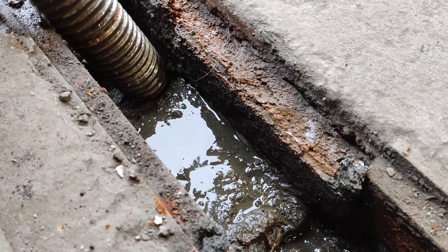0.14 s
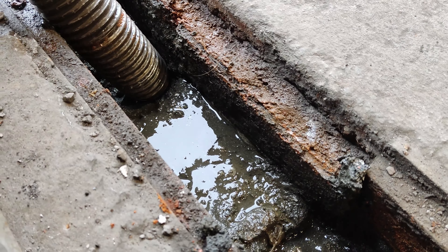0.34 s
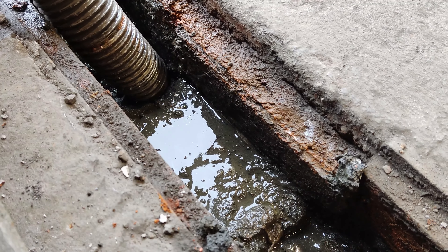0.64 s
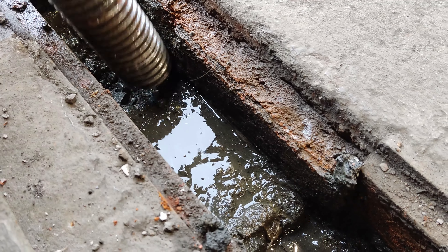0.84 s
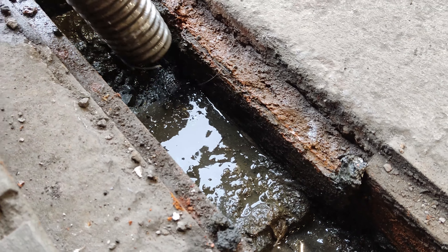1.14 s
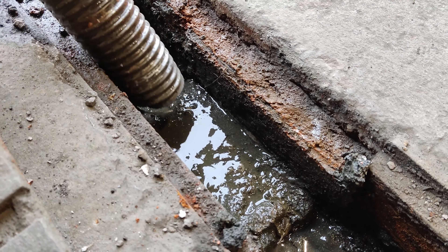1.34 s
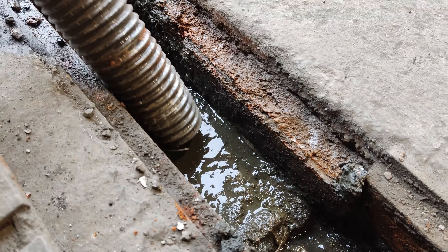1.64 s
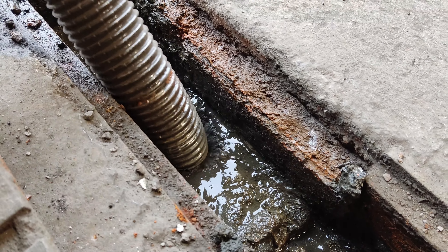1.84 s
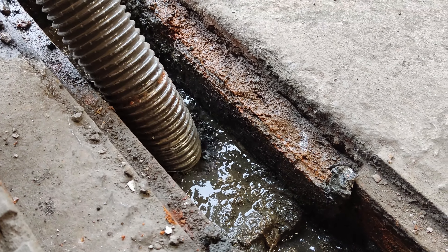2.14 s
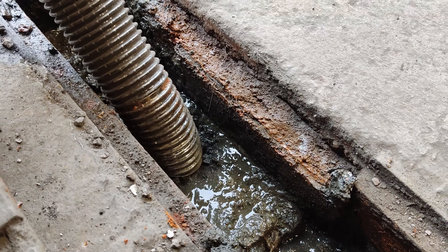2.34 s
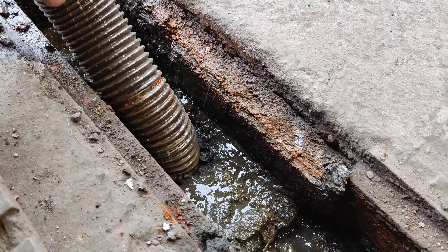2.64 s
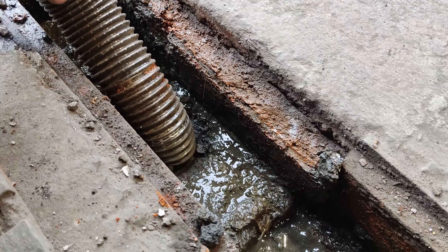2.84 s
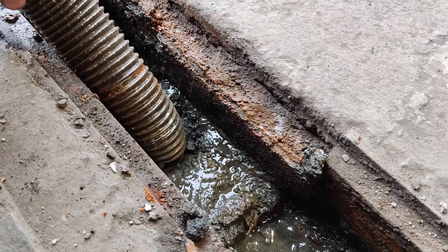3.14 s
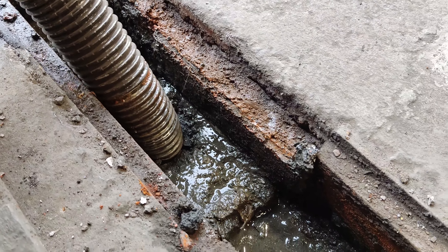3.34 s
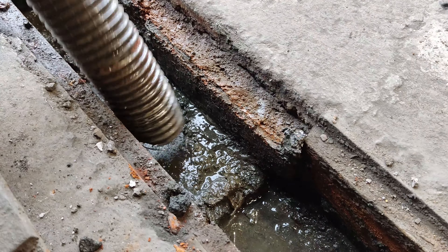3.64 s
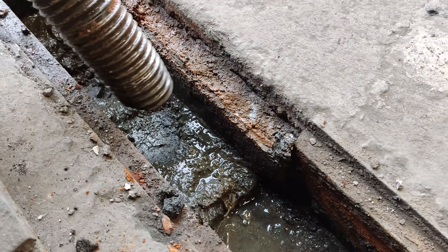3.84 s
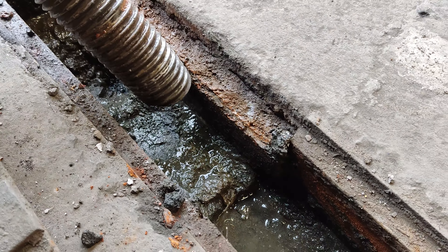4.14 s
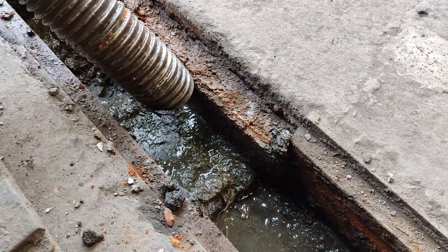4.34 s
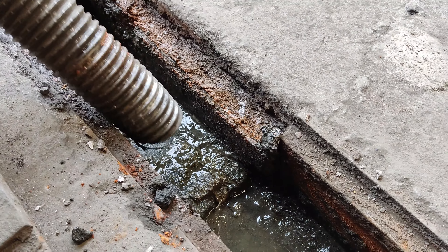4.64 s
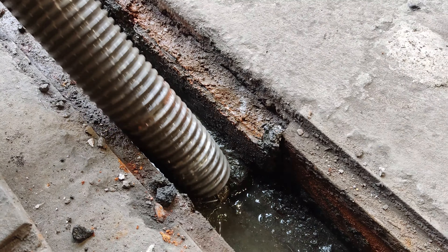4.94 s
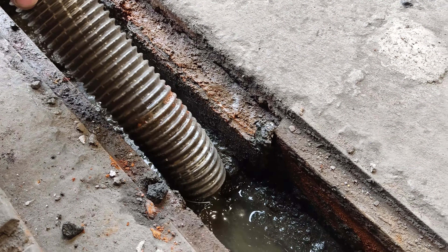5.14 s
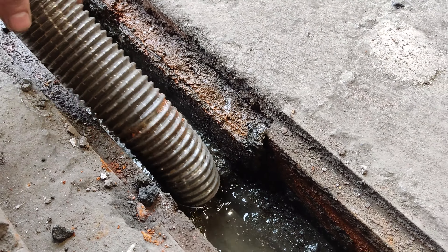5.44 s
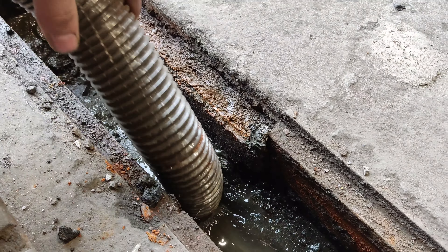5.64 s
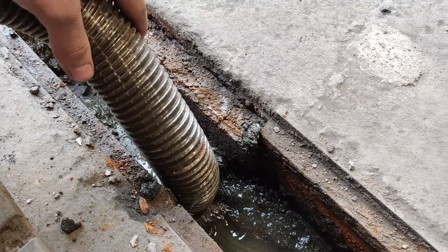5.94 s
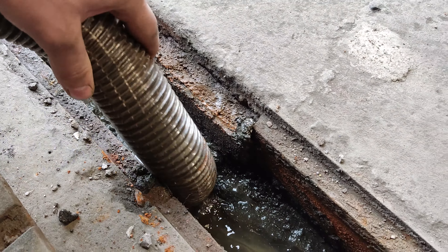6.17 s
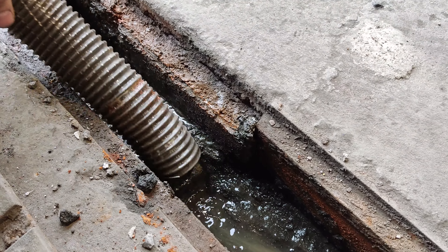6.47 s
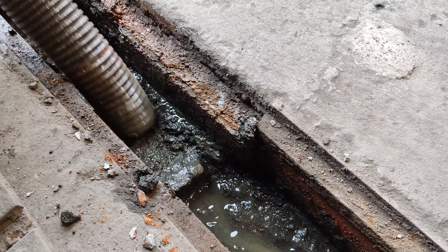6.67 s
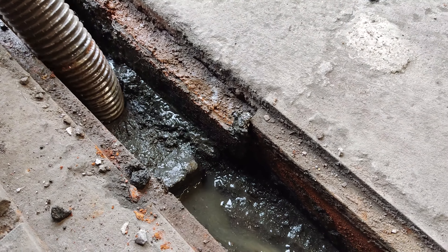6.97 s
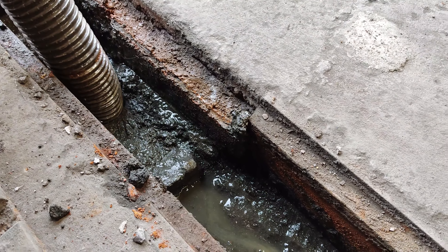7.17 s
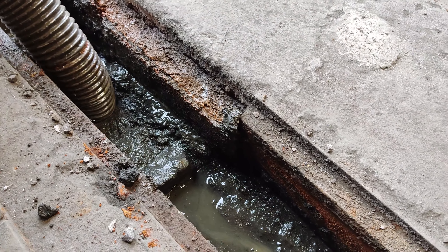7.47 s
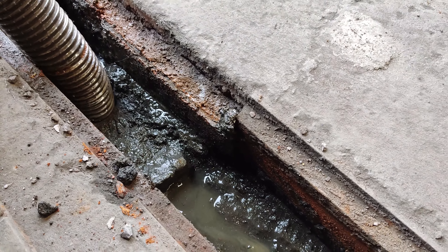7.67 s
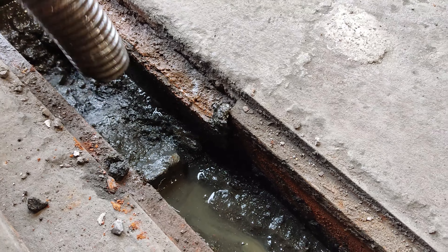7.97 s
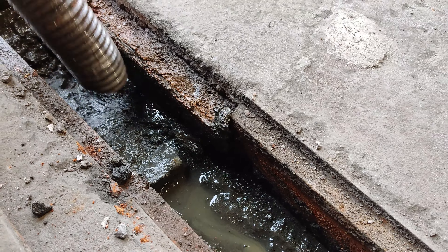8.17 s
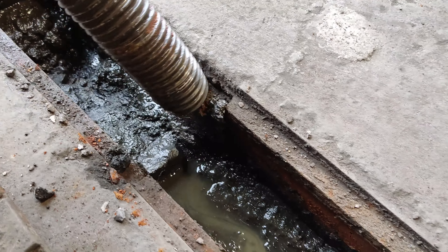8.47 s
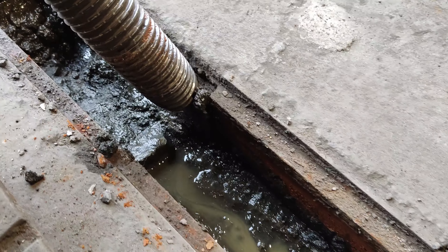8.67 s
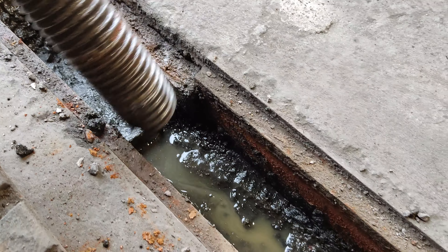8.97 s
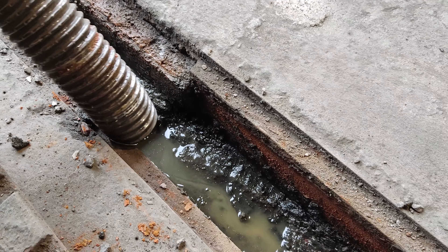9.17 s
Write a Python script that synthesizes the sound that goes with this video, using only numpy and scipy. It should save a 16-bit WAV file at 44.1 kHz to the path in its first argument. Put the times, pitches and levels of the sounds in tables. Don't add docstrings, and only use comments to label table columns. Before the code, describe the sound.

A wet suction hose works along a sludgy drain channel, close to a phone's stereo microphones. Bright, prickly spray hiss runs throughout over rushing air, a low bore roar and gurgling. The mouth chokes, seals and reopens, causing abrupt dips and surges. Grit ticks at the rim, a few slugs slap around four and five and a half seconds, and a thin whistle flashes just after six.

```python
import sys
import numpy as np
from scipy import signal
from scipy.io import wavfile
from scipy.ndimage import map_coordinates

SR = 44100
rng = np.random.default_rng(int(sys.argv[2]) if len(sys.argv) > 2 else 0)


def put_to_file(sound):
    columns = np.atleast_2d(sound).T
    safe = np.clip(columns, -1, 1)
    whole_steps = np.round(safe * 32767)
    wavfile.write(sys.argv[1], SR, whole_steps.astype(np.int16))


def to_linear_factor(level_db):
    exponent = np.asarray(level_db, float) / 20
    return 10 ** exponent


N = 410571


def unit_rms(x):
    return x / np.sqrt(np.mean(x ** 2) + 1e-20)


def in_time(rows):
    s, *columns = np.transpose(rows)
    return [np.interp(np.arange(N) / SR, s, c) for c in columns]


def drift(rate_hz):
    r = np.exp(-80 * np.pi * rate_hz / SR)
    noise = rng.standard_normal(N // 40 + 2002)
    slow = signal.lfilter([1], [1, -2 * r, r * r], noise)[2000:]
    return np.interp(np.arange(N) / 40, np.arange(len(slow)), unit_rms(slow))


def resonance(x, hz, width_hz):
    r = np.exp(-np.pi * width_hz / SR)
    top = np.array([1, 0, -1]) * (1 - r * r) / 2
    return signal.lfilter(top, [1, -2 * r * np.cos(2 * np.pi * hz / SR), r * r], x)


def tents(s, before, after, *columns):
    t = np.arange(0, N + 64, 64)[:, None] / SR - s
    shape = np.clip(1 - np.where(t < 0, -t / before, t / after), 0, 1)
    return np.array([np.interp(np.arange(N) / 64, np.arange(len(t)), shape @ c) for c in columns])


# (time [s], left port later by [ms], how well seated [0-1])
SEATING = [(0, 0.13, 0.87), (.46, 0.18, 0.82), (1.05, 0.087, 0.73), (1.15, 0.11, 0.3), (1.63, 0.21, 0.02),
           (1.86, 0.09, 0.77), (3.76, 0.11, 0.84), (3.82, 0.15, 0.33), (4.3, 0.14, 0.3), (4.7, 0.14, 0.54),
           (5.8, 0.071, 0.93), (6.5, 0.09, 0.8), (7.15, 0.19, 0.89), (7.98, 0.18, 0.75), (8.0, 0.14, 0.74),
           (8.6, 0.3, 0.6), (9.0, 0.12, 0.44), (9.31, 0.24, 0)]
WALL_LAG_MS = .47


def placed(four, pan_db):
    lag = in_time(SEATING)[0] * SR / 1000
    late_mouth = map_coordinates(four[0], [np.arange(N) - lag], order=1, mode="nearest")
    late_wall = np.roll(four[1], round(WALL_LAG_MS * SR / 1000))
    left = late_mouth + four[1] + four[2]
    right = four[0] + late_wall + four[3]
    return np.array([left, right]) * to_linear_factor(np.array([pan_db, -pan_db]) / 2)


def swing():
    lifted = 1 - np.clip(in_time(SEATING)[1], 0, 1)
    return lifted * (-4.5 + 1.5 * drift(0.48))


# (time [s], depth [dB], half length [s], shift to the left [dB])
CHOKING = [(1.483, 2.5, 0.061, 7), (1.632, 5.5, 0.047, -2), (2.164, 2, 0.063, 2.5), (3.352, 2, 0.056, 0),
           (4.175, 3, 0.055, -3), (4.553, 4, 0.036, -3), (4.715, 1.5, 0.088, -5.5), (5.06, 3.5, 0.12, -10),
           (5.498, 5, 0.062, -10), (5.742, 1, 0.045, -1), (5.87, 3, 0.062, 4.5), (5.967, 3.5, 0.053, -6),
           (6.554, 5, 0.042, 0), (6.686, 5, 0.079, -6), (7.594, 3, 0.063, -0.5), (8.17, 4.5, 0.023, -8),
           (8.348, 2.5, 0.06, -6), (8.458, 2, 0.071, -8.5), (8.76, 1.5, 0.076, -8.5), (9.15, 4, 0.09, -7.5)]
# (time [s], depth [dB], closing [s], reopening [s], shift to the left [dB])
SEALING = [
    (.98, 10, 0.075, 0.1, 2),
    (3.795, 12, 0.078, 0.0087, 9),
    (3.825, 3, 0.029, 0.024, 8),
    (4.4, 6.5, 0.06, 0.068, -1.5),
    (6.4, 4.5, 0.062, 0.16, 4),
    (8.01, 7.5, 0.054, 0.039, -1),
    (8.135, 8.5, 0.23, 0.0098, 2.5),
    (8.516, 13, .004, .006, -10),
    (8.545, 11.5, 0.047, 0.1, -10.5),
]


def blockage():
    s, depth_db, half, shift_db = np.transpose(CHOKING)
    at, seal_db, closing, reopening, turn_db = np.transpose(SEALING)
    return tents(s, 1.3 * half, half, depth_db, shift_db) + tents(at, closing, reopening, seal_db, turn_db)


WALL_SHARE, SCATTER_HZ = 0.21, 5800
CROSS_HZ, CROSS_WIDTH_HZ, CROSS_SHARE, CROSS_RIGHT_DB = 4420, 1350, 0.55, 2.5
EDGE_HZ, EDGE_WIDTH_HZ, EDGE_SHARE = 4840, 1200, 0.46


def paths(hz, seated, diffuse):
    kept = (1 - diffuse) / (1 + (hz / SCATTER_HZ) ** 6.0)
    cross = np.exp(-((hz - CROSS_HZ) / CROSS_WIDTH_HZ) ** 2)
    kept *= 1 - CROSS_SHARE * cross
    kept *= 1 - EDGE_SHARE * np.exp(-((hz - EDGE_HZ) / EDGE_WIDTH_HZ) ** 2)
    direct = kept * seated
    wall = kept * (1 - seated) * WALL_SHARE ** (hz / (hz + 900)) / (1 + (hz / 3000) ** 2)
    scattered = np.sqrt(1 - direct - wall)
    to_right = to_linear_factor(CROSS_RIGHT_DB * cross)
    return np.array([np.sqrt(direct), np.sqrt(wall), scattered / to_right, scattered * to_right])


def turbulence(spectrum, excite, split, own_db, own_rate):
    hz, level_db = np.transpose(spectrum)
    edges = hz[0] * 2 ** np.arange(0, np.log2(hz[-1] / hz[0]) + .25, .3)
    white = excite * rng.standard_normal((2, 4, N))
    out = np.zeros((4, N))
    for k, (low, high) in enumerate(zip(edges, edges[1:])):
        band = signal.sosfilt(signal.butter(2, [low, high], "band", fs=SR, output="sos"), white[k % 2])
        gain_db = np.interp(np.log(low * high) / 2, np.log(hz), level_db) + own_db * drift(own_rate)
        out += to_linear_factor(gain_db) * band * split(np.sqrt(low * high))
    return out / np.sqrt(np.mean(np.sum(out[:3] ** 2, axis=0)))


def slurps(per_s, decay_s, depth):
    bursts = (rng.random(N) < per_s / SR) * rng.exponential(1, N)
    return 1 + depth * signal.lfilter([1], [1, -np.exp(-1 / (decay_s * SR))], bursts)


# (time [s], mode [Hz], direct share of spray [0-1], dip above the mode [dB])
CHANNEL_MODE = [(0, 2820, 0.65, 7), (.45, 3070, 0.58, 3), (.8, 3160, 0.7, 1), (1.02, 2880, .9, 0),
                (1.3, 2980, 0.3, 2), (1.6, 3450, 0.3, -1.5), (1.85, 3230, 0.8, .5), (2.2, 3350, 0.57, 1),
                (3.7, 3300, 0.55, 3.5), (4.0, 3300, 0.2, -4), (4.3, 3330, .5, 2), (4.6, 3300, 0.4, -3.5),
                (5.25, 3620, 0.7, 3), (5.5, 3400, 0.65, 8), (5.9, 3630, 0.7, 4), (6.4, 3570, 0.45, 1.5),
                (6.7, 3100, 0.8, 6), (7.0, 3000, 0.5, 4), (7.3, 3000, 0.68, 9), (7.98, 2680, 0.93, 7),
                (8.05, 3200, .25, -3.5), (8.6, 3280, 0.2, 2), (8.95, 3280, 0.6, -4), (9.31, 3320, 0.5, -9)]
# (time [s], level [dB])
FAR_WALL = [(0, 0.8), (1.05, 0), (1.2, .8), (1.8, 2), (2.2, 1), (3.0, 1.8), (3.7, 2.5), (4.0, 2.8),
            (5.0, 2), (5.6, 2.5), (6.6, 5), (6.85, 1), (8.0, 0.2), (8.2, 2), (8.7, 2.5), (9.31, 3.2)]
LEFT_LAG = [(0, 0), (.65, .3), (.82, .9), (1.14, 1.08), (1.24, 1.9), (1.3, 2.0)]
# (time [s], lag [half turns])
BOUNCE_LAG = [(0, .2), (.3, 0), (1.05, 0), (1.2, .9), (6.7, .95), (6.85, 0), (8.0, 0), (8.3, .5),
              (8.7, .95), (9.31, .9)]
DIRECT_SHARE = [(.7, .6), (.84, .8), (.93, 1), (1.09, 1), (1.16, .85), (1.25, .6), (1.38, .65), (1.55, .4),
                (2.0, .33), (2.4, .15), (3.0, 0)]
BOUNCE_FROM, BOUNCE_TO, BOUNCE_TOP_HZ = 1.3, 1.37, 7400
DIP_AT, DIP_WIDTH = 1.16, 0.092
SPRAY_FROM, SPRAY_ROLL_DB = 0.83, 58


def channelled(four, pan_db):
    hz, s, (direct, left, right) = signal.stft(four[[0, 2, 3]], SR, nperseg=256)
    at = np.minimum((s * SR).astype(int), N - 1)
    hz = hz[:, None]
    mode_hz, share, dip_db = (c[at] for c in in_time(CHANNEL_MODE))
    ratio = hz / mode_hz
    kept = share * np.interp(ratio, *np.transpose(DIRECT_SHARE))
    above = np.clip((ratio - BOUNCE_FROM) / (BOUNCE_TO - BOUNCE_FROM), 0, 1)
    turns = np.interp(ratio, *np.transpose(LEFT_LAG)) + in_time(BOUNCE_LAG)[0][at] * above
    bounce_db = in_time(FAR_WALL)[0][at] * above / (1 + (hz / BOUNCE_TOP_HZ) ** 10)
    roll_db = SPRAY_ROLL_DB * np.maximum(SPRAY_FROM - ratio, 0)
    colour_db = bounce_db - roll_db - dip_db * np.exp(-((ratio - DIP_AT) / DIP_WIDTH) ** 2)
    cross_db = CROSS_RIGHT_DB * np.exp(-((hz - CROSS_HZ) / CROSS_WIDTH_HZ) ** 2)
    side_db = pan_db[at] / 2 * (1 - 0.29 * kept) - cross_db
    straight, stray = np.sqrt(kept) * direct, np.sqrt(1 - kept)
    pair = [(straight * np.exp(-1j * np.pi * turns) + stray * left) * to_linear_factor(colour_db + side_db),
            (straight + stray * right) * to_linear_factor(colour_db - side_db)]
    return signal.istft(np.array(pair), SR, nperseg=256)[1][:, :N]


# (time [s], spray level [dB], air rush level [dB])
SUCTION = [(0, -16, -29), (.85, -15.5, -31), (1.1, -17.5, -33), (1.5, -21, -29), (1.9, -16.5, -25.5),
           (2.3, -16.5, -28), (3.0, -17, -32.5), (3.7, -16.5, -32.5), (3.88, -22, -32.5),
           (4.25, -17.5, -30), (4.6, -20, -31), (5.2, -17, -26), (6.4, -18, -30.5), (6.95, -16.5, -28.5),
           (7.25, -16, -34.5), (7.93, -17, -38.5), (8.2, -19.5, -30), (9.31, -20, -30.5)]
# (frequency [Hz], density [dB per Hz])
SPRAY_COLOUR = [(1700, -8), (2800, 1.5), (3500, 3), (4500, 0), (6000, -1.5), (8000, 0.5), (11000, 0),
                (14500, -4)]
# (frequency [Hz], density [dB per Hz])
RUSH_COLOUR = [(600, -31), (950, 4.5), (1400, 0), (2200, 5), (2700, 1), (3500, -4)]


def mouth(seated, choke_db, turned_db):
    spray_db, rush_db = in_time(SUCTION)
    spray_db = spray_db - choke_db
    rush_db = rush_db - 0.78 * choke_db
    pan_db = 2.53 + turned_db
    surge = to_linear_factor(0.054 * drift(2.4) + 0.14 * drift(41)) * slurps(per_s=77, decay_s=0.0056, depth=0.16)
    droplets = to_linear_factor(0.88 * np.minimum(rng.exponential(1, N), 5))
    spray = turbulence(SPRAY_COLOUR, surge * droplets, lambda hz: 1, own_db=0.94, own_rate=5.6)
    rush = turbulence(RUSH_COLOUR, surge ** 1.27, lambda hz: paths(hz, seated, diffuse=0.11),
                      own_db=1.68, own_rate=9.4)
    return to_linear_factor(spray_db + 0.47) * channelled(spray, pan_db) + to_linear_factor(rush_db + 1.0) * placed(rush, 1.18 * pan_db)


# (time [s], roar rises by [dB], half length [s])
AIR_GULPS = [(0.01, 10, 0.17), (0.194, 9, 0.2), (1.707, 1.5, 0.13), (2.33, 2, .15), (4.034, 4, 0.049),
             (4.227, 4.5, 0.15), (4.822, 3, 0.085), (5.147, 3.5, 0.25), (5.613, 3.5, 0.37),
             (6.125, 9.5, 0.069), (6.575, 3, 0.034), (7.163, 6, 0.099), (8.244, 2.5, 0.21),
             (8.623, 2, 0.084), (9.102, -4, 0.073)]


def gulps():
    s, db, half = np.transpose(AIR_GULPS)
    return tents(s, 0.28 * half, half, db)[0]


def hose_modes(modes, lumps, own_db):
    noise = lumps * rng.standard_normal((4, N))
    total = np.zeros((4, N))
    for k, (hz, width_hz, db) in enumerate(modes):
        ring = resonance(resonance(noise, hz, width_hz), hz, width_hz)
        total += (-1) ** k * to_linear_factor(db + own_db * drift(14.0)) * ring
    return unit_rms(total)


def gurgle(per_s, cycles):
    clicks = (rng.random((4, N)) < per_s / SR) * rng.normal(0, 1, N)
    pitch_of_click = rng.integers(0, 4, N)
    total = np.zeros((4, N))
    for k, hz in enumerate(np.geomspace(450, 850, 4)):
        total += resonance(clicks * (pitch_of_click == k) + 1e-18, hz, 2.2 * hz / cycles)
    return unit_rms(total)


# (frequency [Hz], level [dB rms])
TURBINE_TONES = [
    (290.7, -43),
    (2681, -48),
]


def turbine():
    turned_s = np.cumsum(1 + 0.00193 * drift(0.57)) / SR
    tones = np.zeros(N)
    for hz, db in TURBINE_TONES:
        tones += to_linear_factor(db + 4 + 3.1 * drift(14.0)) * np.sin(2 * np.pi * hz * turned_s)
    return np.array([tones, np.roll(tones, round(0.00037 * SR))])


# (time [s], roar level [dB])
BORE_AIR = [(0, -36.5), (.98, -40.5), (1.07, -29), (1.85, -30), (2.15, -32.5), (3.2, -40.5), (3.75, -37.5),
            (3.93, -29.5), (5.6, -30), (5.9, -35), (6.3, -38.5), (6.55, -31.5), (6.87, -28.5), (7.3, -41.5),
            (7.85, -43.5), (8.2, -28.5), (8.8, -35), (9.31, -29.5)]
# (time [s], gurgle level [dB])
BORE_SLUDGE = [(0, -31), (.36, -31.5), (.6, -34), (.98, -34.5), (1.08, -27.5), (1.5, -34), (1.87, -30.5),
               (2.7, -37.5), (3.75, -38.5), (3.93, -34), (4.85, -32.5), (5.6, -27.5), (6.87, -31.5),
               (7.15, -29), (7.5, -39), (8.05, -35), (8.2, -33.5), (9.31, -33)]
# (frequency [Hz], width [Hz], level [dB])
ROAR_MODES = [(33.5, 50, -0.5), (94, 35, -5), (173, 131, 3), (273.6, 94, 1.5), (381, 246, -1)]
# (frequency [Hz], width [Hz], level [dB])
GURGLE_MODES = [(484.6, 108, 6.5), (616, 122, 8.5), (842, 250, -1.5)]


def bore(seated, choke_db, turned_db):
    gulp_db = gulps()
    pan_db = 3.5 + turned_db
    roar_db = in_time(BORE_AIR)[0] + gulp_db - 0.32 * choke_db
    tone_db = in_time(BORE_SLUDGE)[0] + 0.23 * gulp_db - 0.7 * choke_db
    lumps = to_linear_factor(0.39 * drift(20.0))
    roar = hose_modes(ROAR_MODES, lumps, own_db=0.5)
    walls = signal.sosfilt(signal.butter(1, 210, "high", fs=SR, output="sos"), roar[2:])
    roar = np.array([roar[0], 0 * roar[1], *(to_linear_factor(-4.5) * walls)])
    tones = hose_modes(GURGLE_MODES, lumps, own_db=0.3) + to_linear_factor(-2) * gurgle(per_s=400, cycles=10.2)
    tones = unit_rms(tones) * paths(680, seated ** 0.27, diffuse=0.028)
    return (to_linear_factor(roar_db - 0.45) * placed(roar, -3.5 + 1.1 * pan_db)
            + to_linear_factor(tone_db + 1.0) * placed(tones, 0.82 * pan_db)
            + to_linear_factor(0.75 * (roar_db + 29)) * turbine())


# (time [s], peak level [dB], left-right [dB], length [ms])
GRIT = [(.2455, 14, 0, 1.2), (.2583, 7, 0, 1.2), (.2983, 2, 0, 1.2), (1.0011, -11, 1.0, 2.5),
        (1.046, -10, 0.5, 2.5), (1.453, 3, 12, 2.8), (1.5199, 2, 6, 2.5), (1.568, 6, -4, 2.7),
        (1.731, -7, -2.5, 2.5), (3.6521, -8, -4, 2.5), (3.8008, -4, 3, 2.1), (3.895, -8, -1.5, 2.5),
        (4.3735, 7, 2, 2.5), (4.4393, -9, -1.5, 2.5), (4.4633, -9, -3.0, 2.5), (4.5755, -1, -1.5, 2.5),
        (4.6444, 6, -1, 3), (4.9836, 4, 9, 2.5), (5.073, 6, -1, 2.5), (5.9025, 7, 1, 3.1),
        (6.4732, -6, 4, 2.5), (6.5799, -6, -1.5, 1.9), (7.8344, 5, -8, 3.4), (8.0212, -18, 0.0, 2.1),
        (8.0446, 6, -14, 1.3), (8.1484, 1, -8, 2.5), (8.167, 7, -4, 1.2), (8.19, -1, -4, 1.5),
        (8.2771, 6, 7, 2.8), (8.3245, 3, 3, 2.5), (8.521, 7, -4, 2.5), (8.5574, 0, -3, 2.5),
        (8.6772, -4, 13, 2.5), (9.046, 2, 5, 3.2), (9.1092, 5, 5, 3.1)]


def spits():
    out = np.zeros((2, N))
    t = np.arange(2000) / SR
    for s, db, pan_db, ms in GRIT:
        shape = (1 - np.exp(-t / 0.00044)) * np.exp(-t * 1000 / ms)
        burst = np.diff(rng.standard_normal((2, len(t) + 1))) * shape
        at = round(s * SR)
        out[:, at:at + len(t)] += to_linear_factor(db - 17.5 + np.array([[pan_db], [-pan_db]]) / 2) * burst
    return out


# (time [s], peak level [dB], pitch [Hz], time to fall 60 dB [s])
SLUGS = [
    (3.854, -18, 2140, 0.06),
    (4.11, -19.5, 2280, 0.29),
    (4.136, -12.5, 885, 0.075),
    (5.57, -11, 595, 0.04),
    (5.743, -27, 600, 0.045),
]


def slaps():
    out = np.zeros(N)
    t = np.arange(6000) / SR
    for s, db, hz, t60 in SLUGS:
        ring = unit_rms(resonance(rng.standard_normal(len(t)), hz, .5 * hz))
        out[round(s * SR):][:len(t)] += ring * to_linear_factor(db - 60 * t / t60)
    return np.array([out, np.roll(out, round(0.00049 * SR))])


# (time [s], pitch [Hz], level [dB])
RIM_WHISTLE = [
    (6.16, 7200, -50),
    (6.2, 7540, -32),
    (6.3, 7800, -24),
    (6.38, 7800, -27),
    (6.43, 7450, -58),
]


def whistle():
    hz, db = in_time(RIM_WHISTLE)
    low_pass = signal.butter(2, 250, fs=SR, output="sos")
    flutter = unit_rms(signal.sosfilt(low_pass, rng.standard_normal(N)))
    return to_linear_factor(db) * flutter * np.sin(2 * np.pi * np.cumsum(hz) / SR) * to_linear_factor([[-1.5], [1.5]])


def scene():
    seated = np.clip(1.04 * in_time(SEATING)[1], 0, 1) ** 2.2
    choke_db, shift_db = blockage()
    turned_db = swing() + shift_db
    return mouth(seated, choke_db, turned_db) + bore(seated, choke_db, turned_db) + spits() + slaps() + whistle()


def band_limit(x):
    return signal.sosfilt(signal.butter(12, 15210, fs=SR, output="sos"), x)


# (frequency [Hz], width [Hz], boost [dB])
PORT_RINGS = [
    (11180, 1230, 16),
    (8870, 1130, 17.5),
]


def record(dry):
    ported = np.array([x + (to_linear_factor(db) - 1) * resonance(x, hz, w) for x, (hz, w, db) in zip(dry, PORT_RINGS)])
    rounded = .72 * np.tanh(ported / .72)
    cut = signal.sosfilt(signal.ellip(12, .3, 60, 14280, fs=SR, output="sos"), rounded)
    return band_limit(cut)


dry = scene()
out = record(dry)
put_to_file(out)
```